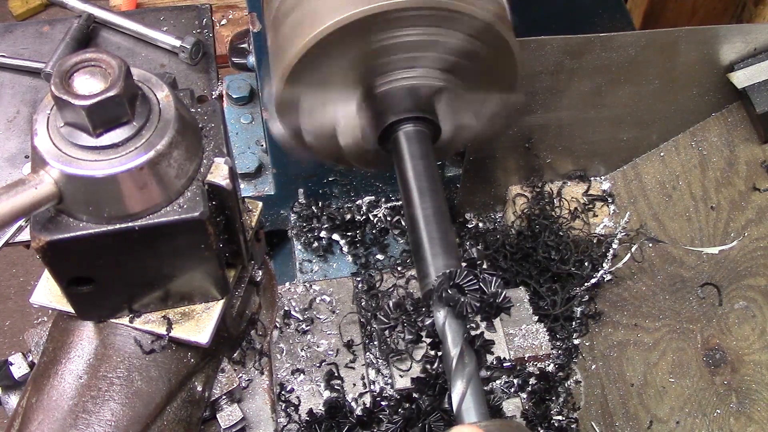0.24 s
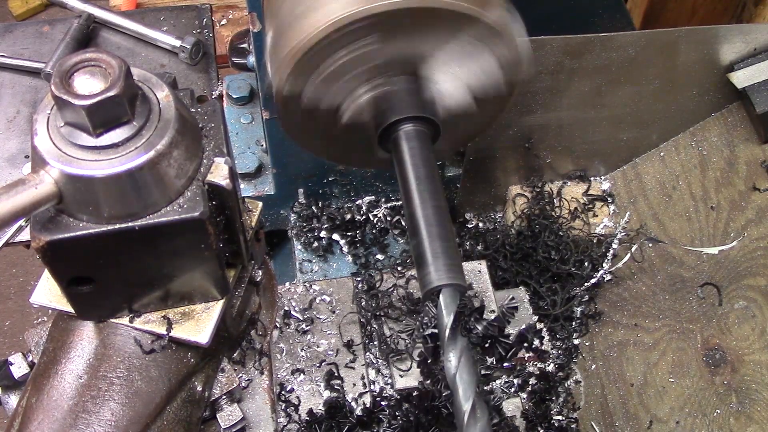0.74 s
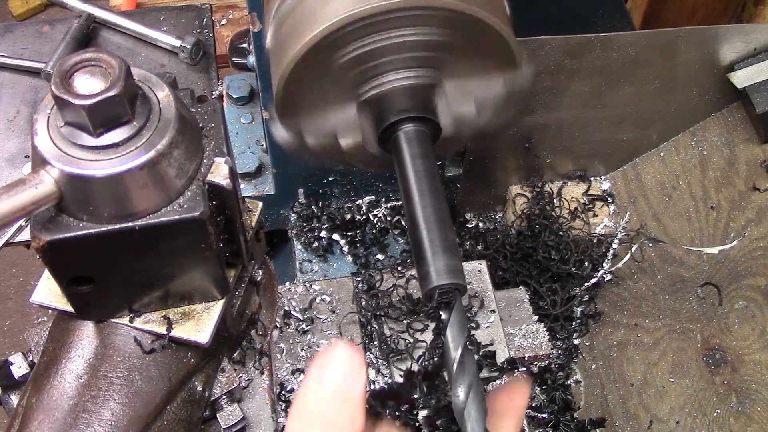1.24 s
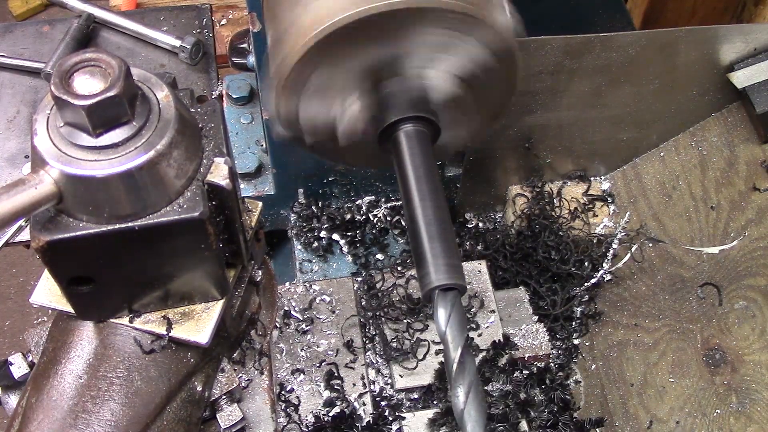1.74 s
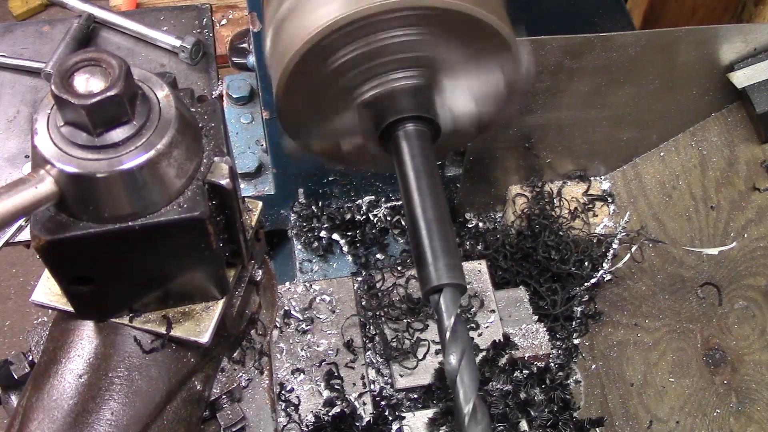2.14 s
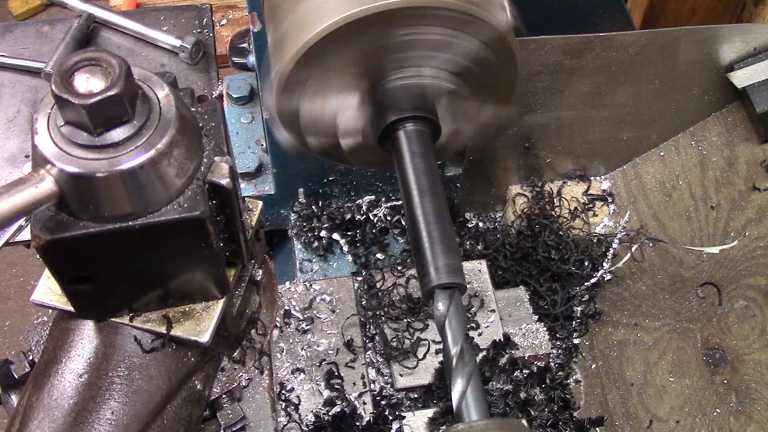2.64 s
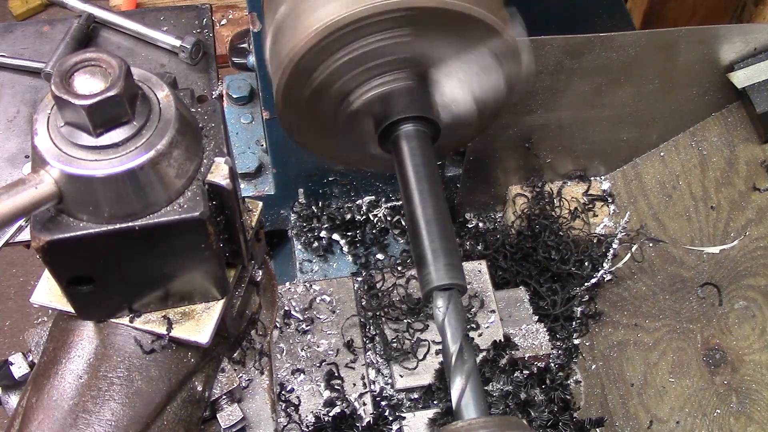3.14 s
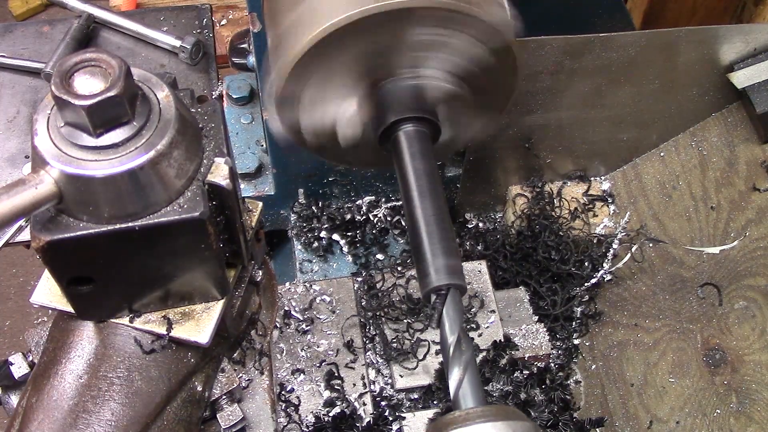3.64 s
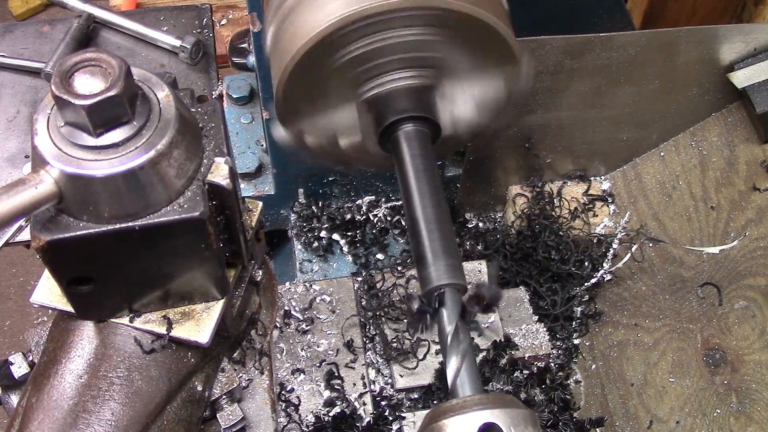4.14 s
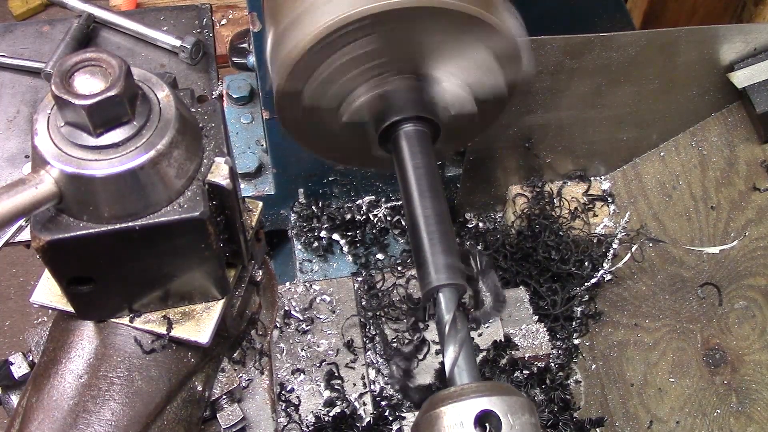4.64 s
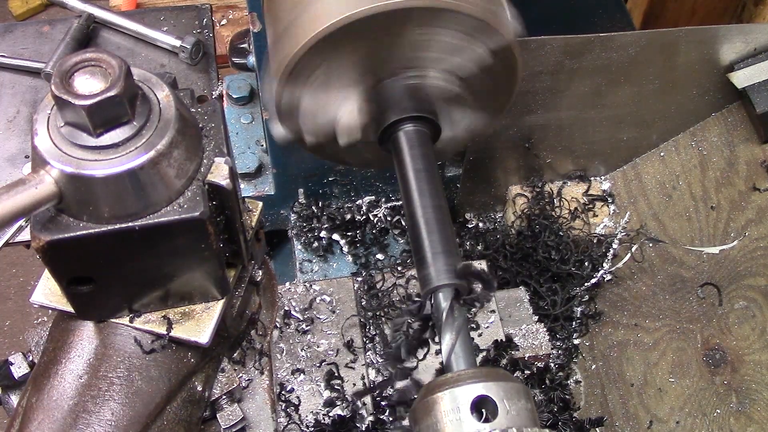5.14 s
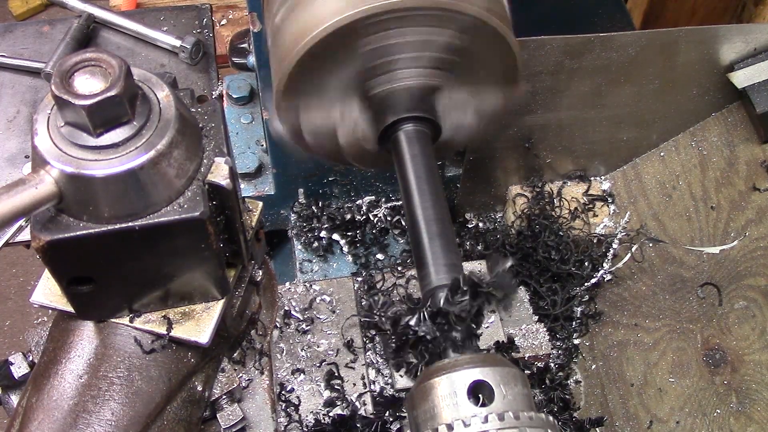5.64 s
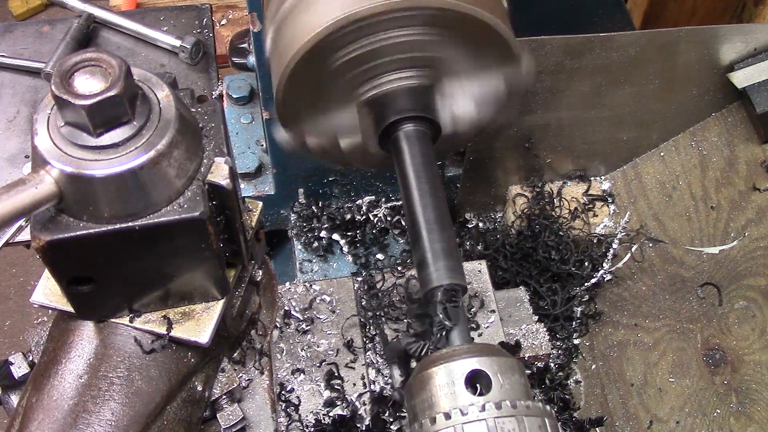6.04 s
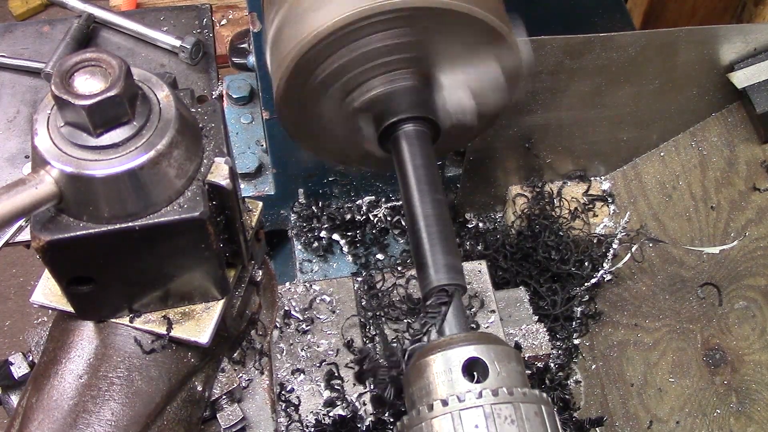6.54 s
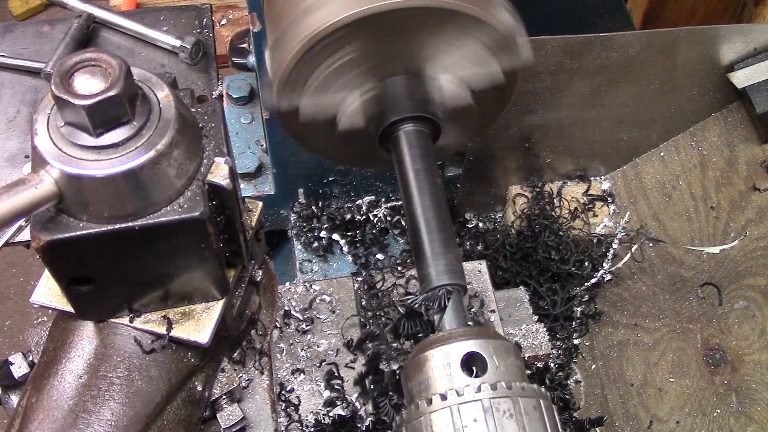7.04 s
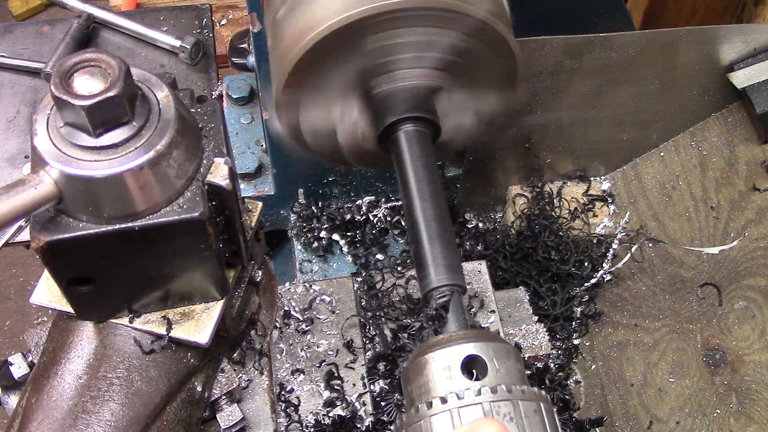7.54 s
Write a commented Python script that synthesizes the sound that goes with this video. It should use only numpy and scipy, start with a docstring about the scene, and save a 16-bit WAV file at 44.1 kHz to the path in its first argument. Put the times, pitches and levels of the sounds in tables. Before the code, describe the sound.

A small lathe runs with a motor hum and whining, rattling gears. A brief fluttering squeal sounds as a drill leaves a spinning plastic bar, then loose shavings tick lightly against the machine. The drill goes back in, and a scraping hiss swells with many high, rising squeals. These give way to a raspy whistle and quick, sharp chirps. The sound is close, with little workshop echo.

```python
"""A small geared lathe hums, whines and rattles while a twist drill squeals out of a spinning plastic bar.
Magnetic forces make the hum; meshing teeth make the whine and rattle. Loose swarf flicks round with the bar for
a moment, then the drill is fed in again: sliding chips hiss and squeal in rising glides. Deep in the hole the
drill whistles and chirps as it winds up and slips."""
import sys
import numpy as np
from scipy import signal
from scipy.fft import rfft, irfft, next_fast_len
from scipy.io import wavfile

SR = 44100
rng = np.random.default_rng(int(sys.argv[2]) if len(sys.argv) > 2 else 0)


def digitize_waveform(pressure):
    """Quantize a signal to 16-bit integers and store it at the path in sys.argv[1].

    Rows of a 2-D input are taken as channels; values are limited to [-1, 1].
    """
    field = np.atleast_2d(pressure).T
    bounded = np.clip(field, -1, 1)
    quanta = np.round(bounded * 32767).astype(np.int16)
    wavfile.write(sys.argv[1], SR, quanta)


N = 343531
TIME = np.arange(N) / SR

# Chips rubbing in the hole. Each row: time in seconds, relative level in dB.
CUT_LEVEL = [(0, -37.5), (.41, -42), (.5, -44), (3.0, -50.5), (3.3, -43), (3.6, -38), (3.85, -29.5),
             (4.15, -25), (4.6, -24.5), (5.0, -21), (5.45, -24), (5.62, -26.5), (6.05, -26.5), (6.4, -26.5),
             (6.838, -25), (6.856, -34), (7.15, -36), (7.32, -41), (7.79, -33.5)]
# Spectrum of that rubbing. Each row: frequency in Hz, relative density in dB.
CUT_SPECTRUM = [(1500, -11), (2800, -14), (3900, -2), (4700, 6.5), (5600, 8), (6500, 2), (7400, 8),
                (8700, 5.5), (10200, 14), (12000, 8.5), (13500, 6.5), (16000, -7)]
# The drill winds up and slips. Each row: time in seconds, grabs per second.
GRAB_RATE = [(0, 37.7), (3.0, 37.7), (5.0, 35.9), (7.79, 35.9)]


def chip_squeals(count=170, first_s=3.9, last_s=5.8, low_hz=5600, high_hz=12800, gain_db=-1.5):
    """Stick-slip oscillation: single chips squeal above a crowd of faint scrapes that swells with the cut."""
    # Each row: start and length in seconds, mid pitch in Hz, rise in octaves per second,
    # relative level in dB, rasp from 0 to 1.
    squeals = [(3.47, 0.21, 12370, 0.93, -39.5, 0.4), (3.6, .09, 6080, 2.6, -37.5, 1),
               (3.633, 0.17, 6790, 0.5, -28.5, 1), (3.79, 0.15, 5600, 0, -35.5, 1),
               (3.65, 0.16, 14700, 1.7, -36, .7), (3.757, .13, 8170, 2.2, -29, .9),
               (3.776, 0.12, 6870, 2, -27, .9), (3.881, 0.16, 7700, 2.2, -23.5, .8),
               (3.947, 0.23, 7610, 1.25, -28, 1), (4.02, 0.21, 14500, .9, -34, .8),
               (4.131, .11, 7200, 1.2, -21, 0.44), (4.144, 0.17, 8950, 2.2, -23, 0.6),
               (4.244, 0.21, 9640, 1.9, -23.5, 0.6), (4.332, 0.14, 5830, 2, -26, 0.8),
               (4.349, .18, 7350, 2.1, -26, 1), (4.477, 0.13, 4700, 2.3, -33, 1),
               (4.528, .12, 10050, 1, -22, 0.7), (4.574, .18, 5590, .8, -24, 0.75),
               (4.575, 0.14, 7300, 1.1, -23.5, 0.9), (4.691, 0.13, 9000, 1.3, -30.5, 1),
               (4.769, 0.24, 7670, 1.6, -26.5, .9), (4.878, 0.17, 9340, .6, -27, 1),
               (4.986, 0.13, 9680, 2, -21.5, 0.7), (5.062, .16, 11250, 0.92, -27, .5),
               (5.069, 0.13, 8100, 1.3, -34, .9), (5.132, 0.25, 6080, 1.7, -27.5, 0.6),
               (5.165, 0.23, 9870, 1.6, -27.5, .9), (5.314, 0.24, 10200, 0.42, -25.5, 1),
               (5.329, 0.13, 4500, 2, -30, 1), (5.343, 0.15, 5330, 0, -28, 1),
               (5.34, .17, 14400, 0, -39, 1), (5.44, 0.19, 14900, 1, -38, 1), (5.46, .12, 12300, 2, -37, 1),
               (5.419, 0.18, 5060, 0.4, -22.5, 0.95), (5.551, 0.19, 10000, 1.6, -32.5, 1),
               (5.6, .13, 13300, 2, -36, 1), (5.694, 0.16, 10870, 1.5, -29.5, 1)]
    when, where = rng.random((count, 2)).T
    starts = first_s + (last_s - first_s) * (np.arange(count) + when) / count
    pitches = low_hz * (high_hz / low_hz) ** where
    levels = np.interp(starts, *np.transpose(CUT_LEVEL)) - 19.5
    motion = dict(throb=.18, lift=.006, stumble=.008, grabs=grab_throb(1), rough_db=2.4)
    loud = sum(squeal(s, s + length, hz, rise, db + gain_db, rasp, **motion)
               for s, length, hz, rise, db, rasp in squeals)
    crowd = sum(squeal(s, s + .085, hz, rise_oct_per_s=1.696, db=db, rasp=.85, **motion)
                for s, hz, db in zip(starts, pitches, levels))
    return loud + colour(crowd, CUT_SPECTRUM)


def chip_hiss(gain_db=-1, grain_db=1.5, sputter_db=1.5, split_hz=9500, mouth_db=-10.5, bottom_db=1):
    """Friction noise: chips scrape along the flutes in clumps, brighter as the drill goes deeper."""
    # Each row: time in seconds, depth of the drill as a share of the hole.
    drill_depth = [(0, 0.68), (1.0, 0.27), (3.4, 0.054), (5.5, 0.28), (7.79, 1)]
    depth, = in_time(drill_depth)
    hiss_db, = in_time(CUT_LEVEL)
    fine_db = mouth_db + depth * (bottom_db - mouth_db) + sputter_db * wander(25)
    clumps = [rng.standard_normal((2, N)) * amp(grain_db * wander(500)) for _ in range(2)]
    coarse, fine = [rms_one(colour(clump, CUT_SPECTRUM)) for clump in clumps]
    coarse = colour(coarse, [(.88 * split_hz, 0), (split_hz, -3), (1.12 * split_hz, -30)])
    fine = colour(fine, [(.88 * split_hz, -30), (split_hz, -3), (1.12 * split_hz, 0)])
    return amp(hiss_db + gain_db) * grab_throb(.13) * (coarse + amp(fine_db) * fine)


def drill_whistle(jitter=.003, rough_db=4):
    """Self-excited vibration: the buried drill rubs the wall and rings on a raspy, slowly sinking note."""
    # Each row: time in seconds, fundamental in Hz.
    pitch_curve = [(5.8, 2523), (6.1, 2470), (6.5, 2445), (6.85, 2471), (7.2, 2443), (7.72, 2413)]
    # Each row: time in seconds, guide levels in dB for the third and the fourth partial.
    guide_levels = [(5.85, -39, -30.5), (6.1, -41, -31), (6.4, -40.5, -32), (6.65, -34, -33.5),
                    (6.83, -44, -27.5), (6.88, -45, -37), (7.3, -47.5, -42), (7.5, -35.5, -45),
                    (7.72, -40.5, -28.5)]
    # Each row: harmonic number, offset in dB, share that follows the fourth's guide, not the third's.
    partials = [(1, -10.5, 0.6), (2, -3, 0.7), (3, 3.8, 0.06), (4, 2, 0.62), (5, -3.3, 0.75),
                (6, -5.5, 0.4)]
    pitch, = in_time(pitch_curve)
    third_db, fourth_db = in_time(guide_levels)
    phase = phase_of(pitch * (1 + jitter * wander(350)))
    out = 0
    for harmonic, db, share in partials:
        tone = friction(harmonic * phase, rasp=.27)
        rough_tone = rms_one(amp(rough_db * wander(60)) * tone)
        out += amp(db + third_db + share * (fourth_db - third_db)) * rough_tone
    return out * grab_throb(.25) * gate(TIME, 5.82, 7.74, fade_s=.054)


def grab_chirps():
    """Stick and slip: each hard grab as the drill winds up and slips gives one chirp."""
    # Each row: time in seconds, relative peak in dB, pitch in Hz.
    grabs = [(6.1055, -27, 5800), (6.1305, -25, 5810), (6.3205, -24, 5660), (6.7136, -19, 5680),
             (6.788, -22, 5680), (6.8144, -22, 5650), (6.8354, -16, 5420), (6.8423, -18, 5640),
             (6.8663, -13.5, 5510), (6.8914, -18.5, 5550), (6.9227, -14, 5490), (6.9491, -25, 5480),
             (6.9753, -23, 5340), (7.006, -19, 5340), (7.0166, -22, 5340), (7.0335, -19, 5460),
             (7.0456, -15.5, 5440), (7.0574, -19, 5350), (7.0714, -22, 5460), (7.0834, -22, 5460),
             (7.1004, -19.5, 5430), (7.1224, -21, 5550), (7.1284, -20, 5550), (7.1526, -15, 5500),
             (7.1793, -13, 5590), (7.2075, -22, 5600), (7.233, -19.5, 5430), (7.2606, -20, 5540),
             (7.2654, -24, 5410), (7.6774, -27, 5370), (7.7034, -21, 4930), (7.7288, -20, 5380)]
    return chirps(grabs, width_s=.0022, delay_s=.0019, gain_db=-3.7, octave_db=-15, rasp=.2)


def chip_squeaks():
    """Brief friction tones: single chips give sharp, high squeaks."""
    # Each row: time in seconds, relative peak in dB, pitch in Hz.
    squeaks = [(.028, -24, 9970), (.6138, -34, 10400), (.6317, -36, 11000), (.6557, -33, 9880),
               (4.171, -10, 7330), (4.191, -16, 7300), (4.298, -14, 9300), (4.3056, -12, 9900),
               (5.1133, -8.5, 11050), (5.2395, -9.5, 9900), (5.2425, -9, 9840), (7.755, -22, 12900),
               (7.78, -20, 10360)]
    return chirps(squeaks, width_s=.0016, delay_s=.0015, gain_db=-5, octave_db=-40, rasp=.2)


def drill_chatter(ring_hz=5610, spread=.022, uneven_db=1.5):
    """Relaxation oscillation: grab after grab excites a faint chirp near the drill's own resonance."""
    # Each row: start and end in seconds, relative peak in dB.
    runs = [(5.684, 6.24, -23), (6.302, 6.55, -28), (6.556, 6.8, -28.5), (6.998, 7.15, -29),
            (7.28, 7.34, -40), (7.643, 7.78, -41)]
    grabs = []
    for start, end, db in runs:
        period_s = 1 / np.interp(start, *np.transpose(GRAB_RATE))
        for s in np.arange(start, end, period_s):
            force, detune = rng.standard_normal(2)
            grabs.append((s, db + uneven_db * force, ring_hz * (1 + spread * detune)))
    return chirps(grabs, width_s=.0045, delay_s=.0019, gain_db=-5, octave_db=-15, rasp=.6)


def drill_withdrawal():
    """Modulated friction tones: on its way out the drill sings three notes that flutter with its grabs."""
    # Each row: end in seconds, mid pitch in Hz, rise in octaves per second, level in dB,
    # rasp from 0 to 1, pitch lift per unit of grab.
    tones = [(.44, 8420, .19, -27, .35, .01), (.495, 6620, .42, -34, .6, .032),
             (.45, 13350, .36, -43, .75, .022)]
    motion = dict(throb=.7, stumble=.0054, grabs=grab_throb(.79), rough_db=3.4)
    return sum(squeal(-.012, end, hz, rise, db, rasp, lift=lift, **motion)
               for end, hz, rise, db, rasp, lift in tones)


def swarf_flicks(rise_s=.005, hold_s=.0055, fall_s=.0033, grain_db=3):
    """Impact excitation: a plastic curl whirls with the bar, each strike a crackle and a damped knock."""
    # Each row: time in seconds, relative levels of snap and knock in dB, knock pitch in Hz.
    flicks = [(1.1554, -38, -28, 1400), (1.33, -45, -31, 1400), (1.72, -44, -28, 2400),
              (2.046, -29.5, -23, 1500), (2.121, -31, -22, 2300), (2.191, -31, -27, 2000),
              (2.253, -33, -17, 2400), (2.3171, -30, -23, 1900), (2.381, -29, -17.5, 1500),
              (2.444, -31, -25, 2200), (2.504, -34, -27, 1700), (2.5695, -28, -22, 1650),
              (2.631, -27.5, -23.5, 1450), (2.695, -32.5, -19.5, 1450), (2.761, -31, -31, 2200),
              (3.053, -42, -41, 1600)]
    # Each row: frequency in Hz, relative density in dB.
    snap_spectrum = [(2500, -5), (4500, 0), (7000, -0.5), (10000, -4), (16000, -17)]
    grains = rng.standard_normal((2, N)) * amp(grain_db * wander(1500))
    snap, force = rms_one(colour(grains[0], snap_spectrum)), rms_one(grains[1])
    out = np.zeros(N)
    for s, snap_db, knock_db, hz in flicks:
        near = np.abs(TIME - s) < .05
        age = TIME[near] - s
        brush = np.clip(age / rise_s + .5, 0, 1) * np.exp(-np.maximum(age - hold_s, 0) / fall_s)
        knock = resonance(brush * force[near], hz, width_hz=480)
        out[near] += amp(snap_db - 1.5) * brush * snap[near] + amp(knock_db - .5) * knock
    return out


def gear_whine(mesh_hz, whine_db, full_mesh_hz=775.3, flutter_hz=18, sway=.00094):
    """Tooth-mesh tones and sidebands follow the shaft speed; uneven tooth load makes each flutter."""
    # Each row: frequency at full speed in Hz, relative levels running free and drilling in dB,
    # phase lead of the left side in radians, flutter from 0 to 1.
    tones = [(259, -18, -20, 1.5, .6), (330.5, -7.5, -12, 2, .2), (388, -16, -12, .8, .8),
             (454, -17, -9, .6, .8), (478, -12, -20, 2, .7), (490.5, -10, -18, -.1, .45),
             (655.3, -5, -8, 2.8, .2), (700.5, -9.5, -10, .68, .3), (748, -9, -8, 1.4, .5),
             (775.3, 3, 2.5, 1.52, .12), (894.8, -6, -3, .1, .2), (1014, -15, -18, 1.5, .4),
             (1082, -18, -18, 1, .5), (1314, -14, -16, 1.5, .3), (1431, -16, -18, 1, .5),
             (1458, -18, -13, .5, .9), (1479, -14, -18, 2, .6), (1524, -7.5, -11, .83, .35),
             (1551, -.5, -.3, 1.6, .2)]
    # Each row: time in seconds, feed from 0 (running free) to 1 (drilling).
    feed_curve = [(2.6, 0), (3.8, 1)]
    feed, = in_time(feed_curve)
    phase_per_hz = phase_of(mesh_hz / full_mesh_hz * (1 + sway * wander(24.99)))
    out = np.zeros((2, N))
    for hz, free_db, fed_db, lead, flutter in tones:
        load = rms_one(1 + flutter * complex_wander(flutter_hz))
        tone = amp(free_db + feed * (fed_db - free_db)) * load * np.exp(1j * hz * phase_per_hz)
        out += [tone.real, (tone * np.exp(-1j * lead)).real]
    return np.sqrt(2) * amp(whine_db) * out


def gear_rattle(mesh_hz, rattle_db, teeth=33, repeat=.38, ripple=.058):
    """Quasi-periodic noise: tooth impacts partly repeat each turn and pulse with the motor's torque."""
    # Each row: frequency in Hz, relative density in dB.
    spectrum = [(25, -29), (100, -18), (190, -5), (300, -4.5), (470, 1), (720, 1.5), (1000, -4),
                (1350, -8.5), (1510, 0), (1720, -9), (2400, -10), (3000, -8), (4200, -22), (15000, -44.5)]
    # Stereo width. Each row: frequency in Hz, side level over mid level in dB.
    width = [(60, 2), (110, 1.5), (200, 3), (380, 0.5), (700, 3.5), (1290, -2), (2380, 0.5), (4400, 0),
             (8120, 1), (15000, -3)]
    turn_samples = round(SR * teeth / np.mean(mesh_hz))
    turns = rng.standard_normal((2, N // turn_samples + 6, turn_samples))
    impacts = signal.lfilter([1], [1, -repeat], turns, axis=1).reshape(2, -1)[:, -N:]
    mid, side = impacts * (1 + ripple * np.sin(hum_phase()))
    side = colour(side, width)
    return amp(rattle_db) * rms_one(colour(np.array([mid + side, mid - side]), spectrum))


def motor_hum(hum_db, waver=.09, octave_waver=.98):
    """Magnetic forces hum at twice the mains frequency; the octave growls under load."""
    # Each row: time in seconds, level of the octave relative to the hum in dB.
    octave_level = [(0, -14), (1.9, -23), (2.5, 1.5), (3.3, -17.5), (4.8, -11), (5.4, -6), (6.75, 1),
                    (7.0, -15)]
    octave_db, = in_time(octave_level)
    phase = hum_phase()
    growl = rms_one(1 + octave_waver * complex_wander(22)) * np.exp(2j * phase)
    hum = np.sin(phase) * (1 + waver * wander(13))
    return np.sqrt(2) * amp(hum_db) * (hum + amp(octave_db) * growl.real)


def workshop(x, lead_rad=np.pi / 2, scatter_rad=.7, scatter_hz=70, room_db=-10, t60_s=.15):
    """Scattering by chuck and tool post shifts the phase between the sides; the room reverberates faintly."""
    size = next_fast_len(N)
    place = np.fft.rfftfreq(size, 1 / SR) / scatter_hz
    knots = np.arange(int(place[-1]) + 2)
    twist = (lead_rad + scatter_rad * np.interp(place, knots, rng.standard_normal(len(knots)))) / 2
    direct = irfft(rfft(x, size) * np.exp(1j * np.array([twist, -twist])), size)[:, :N]
    t = TIME[:SR // 3]
    tail = rng.standard_normal((2, len(t))) * np.exp(-np.log(1000) * t / t60_s)
    tail /= np.linalg.norm(tail, axis=1, keepdims=True)
    return direct + amp(room_db) * signal.fftconvolve(x[None], tail, axes=1)[:, :N]


def squeal(start, end, hz, rise_oct_per_s, db, rasp, throb, lift, stumble, grabs, rough_db, rough_hz=130):
    """A gliding friction tone: each grab modulates its level by throb and its pitch by lift."""
    on = (TIME > start) & (TIME < end)
    t, grab = TIME[on], grabs[on] - 1
    glide_hz = hz * 2 ** (rise_oct_per_s * (t - (start + end) / 2))
    pitch = glide_hz * (1 + stumble * wander(rough_hz, len(t)) + lift * grab)
    grip = (1 + throb * grab) * amp(rough_db * wander(rough_hz, len(t)))
    tone = rms_one(grip * friction(phase_of(pitch), rasp))
    out = np.zeros(N)
    out[on] = amp(db) * tone * gate(t, start, end, fade_s=.024)
    return out


def chirps(rows, width_s, delay_s, gain_db, octave_db, rasp, jitter=.0098, rough_db=2):
    """Stick-slip transients: a scratchy tone and its octave swell and die within milliseconds."""
    out = np.zeros(N)
    for s, db, hz in rows:
        near = np.abs(TIME - s) < .03
        age = TIME[near] - s - delay_s
        phase = phase_of(hz * (1 + jitter * wander(530, len(age))))
        swell = amp(db + gain_db + rough_db * wander(395, len(age))) / np.cosh(age / width_s)
        out[near] += swell * (friction(phase, rasp) + amp(octave_db) * friction(2 * phase, rasp=.45))
    return out


def friction(phase, rasp):
    """Uneven slips spread a tone of rms 1 into sidebands; more rasp frays it into a scrape."""
    # The near and the far sideband skirt. Each row: changes per second, relative strength.
    skirts = [(450, .85), (1600, .3)]
    slips = sum(strength * complex_wander(rate, len(phase)) for rate, strength in skirts)
    return rms_one(((1 - .7 * rasp + rasp * slips) * np.exp(1j * phase)).real)


def grab_throb(depth):
    """Amplitude modulation: the grip on the plastic tightens each time the drill winds up and grabs."""
    grab_hz, = in_time(GRAB_RATE)
    return 1 + depth * np.cos(phase_of(grab_hz))


def hum_phase(hum_hz=120):
    """Phase of the magnetic pull, which peaks twice per mains cycle."""
    return 2 * np.pi * hum_hz * TIME


def resonance(x, hz, width_hz):
    """One damped mode, scaled so that white noise keeps its level."""
    b, a = signal.iirpeak(hz, hz / width_hz, fs=SR)
    return signal.lfilter(b, a, x + 1e-18) * np.sqrt(SR / (np.pi * width_hz))


def colour(x, spectrum):
    """Zero-phase filter from rows of (Hz, dB), joined on a log-frequency axis."""
    hz, db = np.transpose(spectrum)
    size = next_fast_len(x.shape[-1])
    bins = np.maximum(np.fft.rfftfreq(size, 1 / SR), 1)
    gain = amp(np.interp(np.log(bins), np.log(hz), db))
    return irfft(rfft(x, size) * gain, size)[..., :x.shape[-1]]


def wander(rate, size=N):
    """Band-limited noise of spread about 1 that takes a new value rate times a second."""
    place = np.arange(size) * rate / SR
    knots = signal.resample_poly(rng.standard_normal(int(place[-1]) + 12), 4, 1)
    return np.interp(4 * (place + 5), np.arange(len(knots)), knots)


def complex_wander(rate, size=N):
    """Quadrature noise, which modulates both amplitude and phase."""
    return wander(rate, size) + 1j * wander(rate, size)


def phase_of(hz):
    """Phase as the running integral of frequency."""
    return 2 * np.pi * np.cumsum(hz) / SR


def amp(db):
    """Decibels to gain."""
    return 10 ** (np.asarray(db) / 20)


def rms_one(x):
    """Scale to rms 1."""
    return x / np.sqrt(np.mean(np.abs(x) ** 2) + 1e-20)


def in_time(rows):
    """The columns of a curve, interpolated at every sample."""
    s, *columns = np.transpose(rows)
    return [np.interp(TIME, s, c) for c in columns]


def gate(t, start, end, fade_s):
    """One between start and end, with straight fades inside."""
    return np.clip(np.minimum(t - start, end - t) / fade_s, 0, 1)


def scene(pan_db=.35):
    """Superposition: the running machine, and the sounds of the cut slightly to the right."""
    # Each row: time in seconds, tooth-mesh frequency in Hz.
    gear_speed = [(0.0, 771.7), (0.24, 774.5), (2.17, 777.6), (4.88, 771.5), (7.72, 771.8), (7.79, 782)]
    # Each row: time in seconds, relative gear level in dB, hum level in dB.
    machine_levels = [(0, -32.5, -39), (1.08, -32.5, -40), (1.2, -33.5, -35.5), (2.35, -31.5, -39),
                      (2.55, -35, -45.5), (2.79, -42, -46.5), (3.5, -43, -44.5), (3.78, -38, -41.5),
                      (3.95, -34, -38.5), (4.14, -32, -33.5), (4.38, -38.5, -40.5), (4.85, -36, -37),
                      (5.65, -41.5, -43.5), (6.05, -43, -46.5), (6.82, -43, -44.5), (6.87, -50, -55),
                      (7.36, -51.5, -52.5), (7.79, -42, -47.5)]
    mesh_hz, = in_time(gear_speed)
    gear_db, hum_db = in_time(machine_levels)
    machine = motor_hum(hum_db) + gear_whine(mesh_hz, gear_db + 2) + gear_rattle(mesh_hz, gear_db + 7)
    transients = grab_chirps() + chip_squeaks()
    singing = drill_chatter() + chip_squeals() + drill_whistle()
    cut = workshop(singing, room_db=-7, t60_s=.11)
    cut += workshop(drill_withdrawal() + swarf_flicks())
    cut += workshop(transients, lead_rad=.77)
    cut += chip_hiss()
    return machine + cut * amp([[-pan_db], [pan_db]])


def record(dry, cutoff_hz=15900):
    """An elliptic low-pass filter cuts the highest treble steeply."""
    return signal.sosfilt(signal.ellip(12, .1, 90, cutoff_hz, fs=SR, output="sos"), dry)


dry = scene()
out = record(dry)
digitize_waveform(out)
```